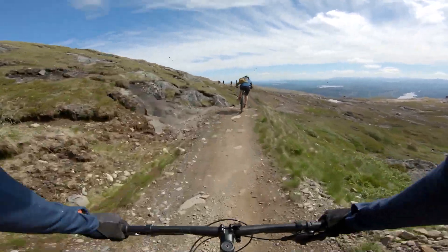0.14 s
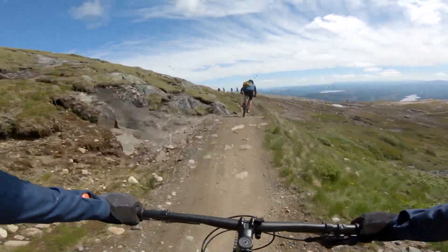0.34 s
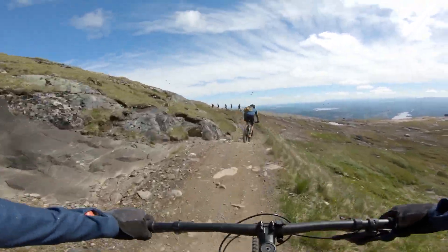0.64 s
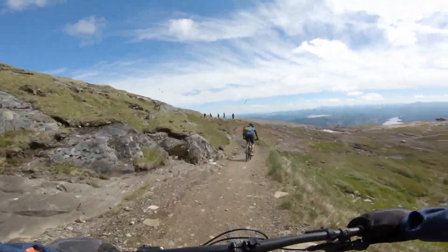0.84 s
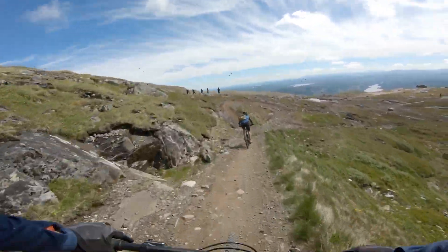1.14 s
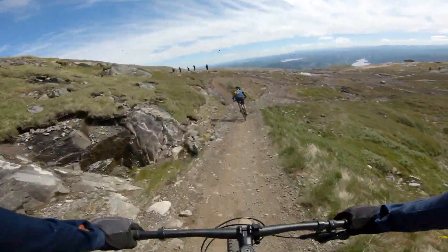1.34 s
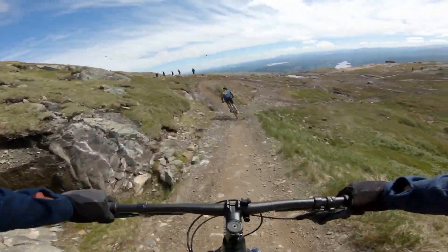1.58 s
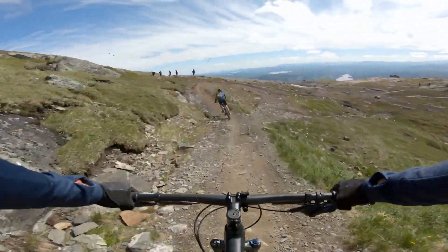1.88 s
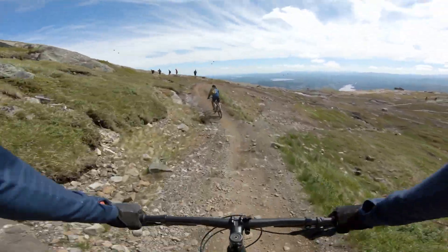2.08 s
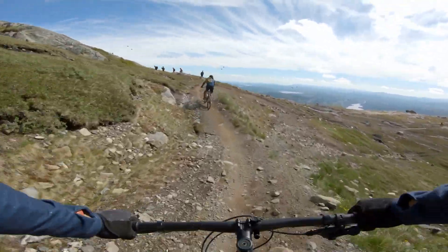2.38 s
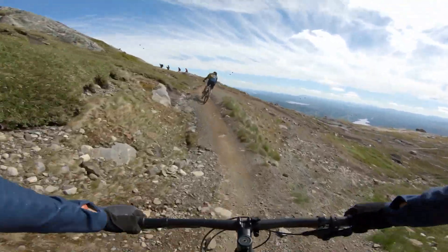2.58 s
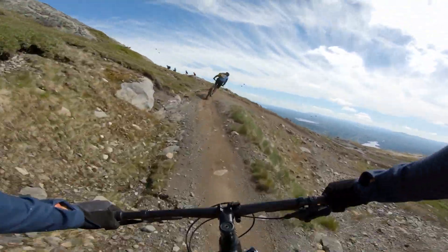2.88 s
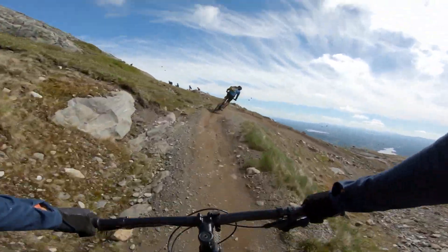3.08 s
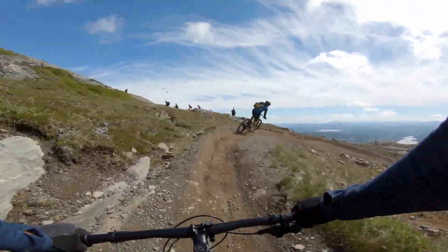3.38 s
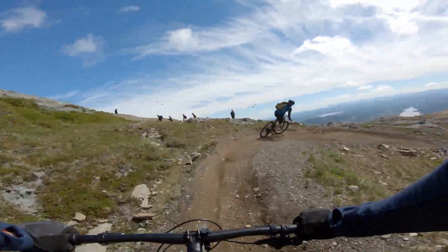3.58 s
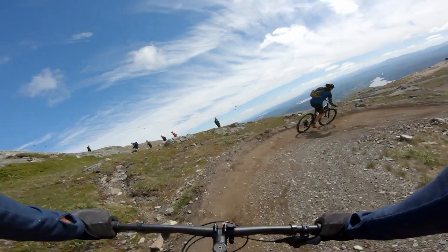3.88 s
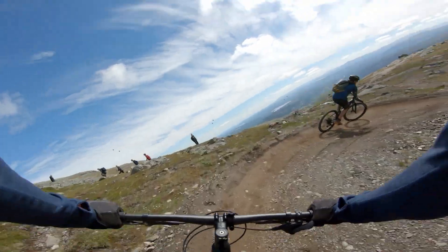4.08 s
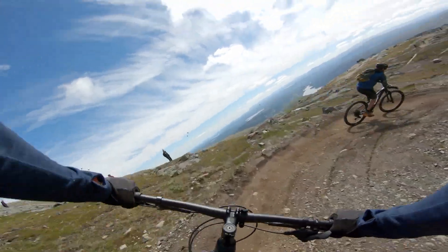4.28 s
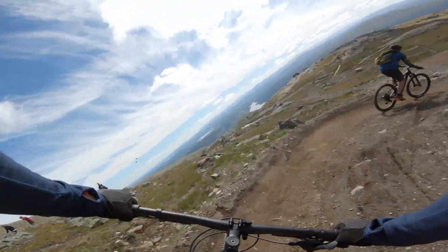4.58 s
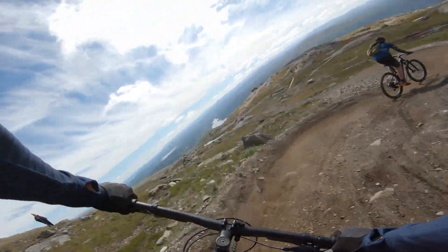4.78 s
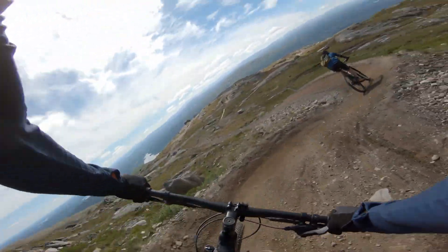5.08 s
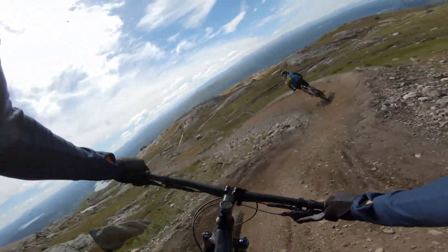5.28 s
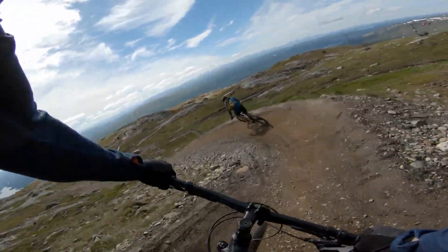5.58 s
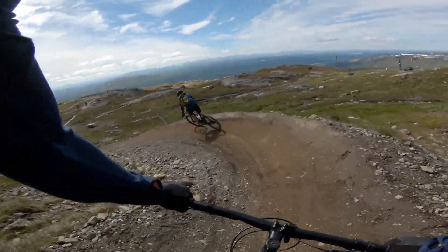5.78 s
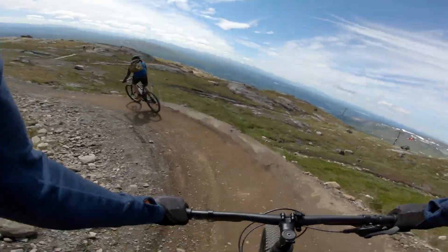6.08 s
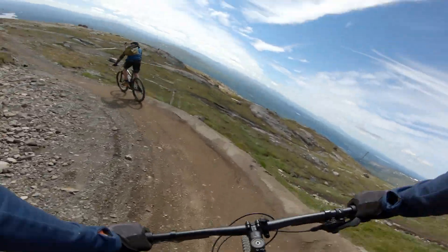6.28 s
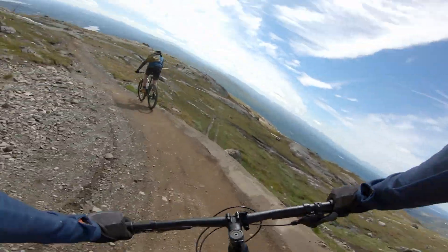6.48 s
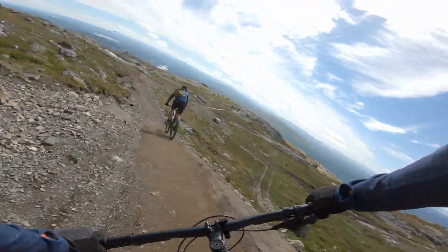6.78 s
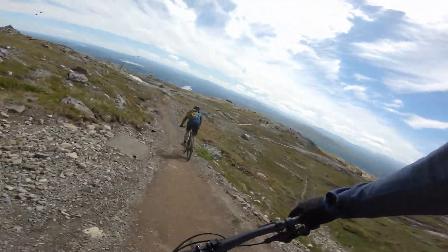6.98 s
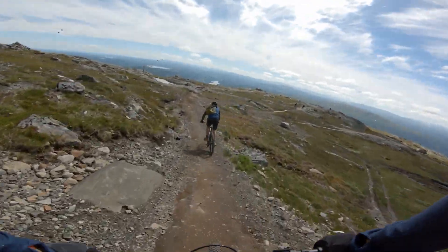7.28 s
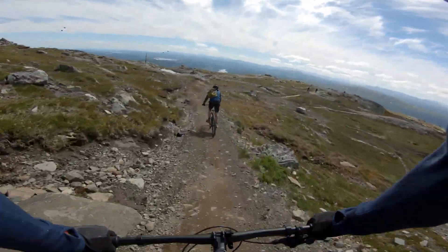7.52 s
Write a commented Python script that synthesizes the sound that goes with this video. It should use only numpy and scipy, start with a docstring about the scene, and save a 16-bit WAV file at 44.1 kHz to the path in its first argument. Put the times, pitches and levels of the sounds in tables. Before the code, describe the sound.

A mountain bike runs fast down a stony trail, heard close up from the rider's chest with slightly dulled treble. Low wind rumbles and flutters on the microphone throughout, with irregular thumping gusts. Beneath it the tyres crunch through loose gravel, stones crack and spray against the frame, pebbles tick off the spokes, and a loose metal part buzzes. The clatter is dense for the first 0.6 seconds, then drops away in a brief hop from about 1.2 to 1.4 seconds. It returns strongly, with hard wind buffets between 2 and 3 seconds. One sharp stone crack stands out near 3.8 seconds. The wind eases from about 4.3 to 5 seconds as a few soft hollow knocks sound. Gusts build again after 5.2 seconds, with more knocks around 6. The buzz fades by 6.7 seconds, leaving wind, lighter crunching and scattered clicks until about 7.6 seconds.

```python
"""Mountain bike on a stony trail.

A fast descent, heard by a housed microphone on the rider's chest. Wind rumbles and flutters on the port.
The tyres growl and crunch in loose gravel; stones crack and spray against the frame, pebbles tick off
rims and spokes. A loose metal part buzzes near 2.5 kHz. The housing dulls the treble."""
import sys
import numpy as np
from scipy import signal
from scipy.fft import rfft, irfft
from scipy.io import wavfile

SR = 44100
rng = np.random.default_rng(int(sys.argv[2]) if len(sys.argv) > 2 else 0)


def digitize_waveform(pressure):
    """Quantize a signal to 16-bit integers and store it at the path in sys.argv[1].

    Rows of a 2-D input are taken as channels; values are limited to [-1, 1].
    """
    field = np.atleast_2d(pressure).T
    bounded = np.clip(field, -1, 1)
    quanta = np.round(bounded * 32767).astype(np.int16)
    wavfile.write(sys.argv[1], SR, quanta)


N = 337365

# air on the port (time [s], rumble [dB], buffet [dB], flutter [dB])
WIND_LEVELS = [(0.0, -25.5, -25.5, -34.5), (0.4, -21.5, -27.5, -32), (0.66, -18, -24, -32),
               (0.91, -24, -29, -41), (1.32, -27, -32.5, -47.5), (1.77, -20, -32, -40),
               (2.28, -24, -25.5, -37), (2.79, -20, -23.5, -34), (2.96, -17.5, -28.5, -37),
               (2.98, -26.5, -31, -40), (3.4, -25.5, -29.5, -41.5), (3.73, -22, -31.5, -39.5),
               (3.92, -19.5, -27.5, -37), (4.35, -31.5, -37, -39), (4.6, -24.5, -40, -42),
               (4.94, -31, -40.5, -39.5), (4.96, -26, -38.5, -39.5), (5.41, -24.5, -26, -41),
               (5.56, -17, -26.5, -37), (5.8, -20, -26, -32.5), (6.45, -20.5, -29, -43.5),
               (6.75, -23, -34, -52.5), (7.26, -25.5, -28, -43.5), (7.44, -21.5, -27, -37),
               (7.65, -17, -25, -30)]
# short gusts (centre [s], half length [s], buffet lift [dB])
WIND_GUSTS = [(.57, 0.035, 6.5), (.72, 0.14, 4), (1.04, 0.056, 3.5), (1.45, 0.066, 5), (1.6, 0.21, 3),
              (1.7, 0.03, 4), (2.04, 0.11, 7), (2.15, 0.05, 5), (2.38, 0.15, 4), (2.52, 0.06, 2),
              (2.84, 0.12, 2.5), (2.94, 0.035, 4), (3.3, 0.097, 1.5), (3.47, 0.044, 6.5),
              (3.95, 0.069, 3.5), (4.37, 0.07, 5), (5.24, 0.18, 7), (5.36, 0.028, 1.5), (5.66, 0.12, 6.5),
              (5.82, 0.053, 1.5), (5.98, 0.071, 5), (6.08, 0.02, 6.5), (6.18, 0.024, 4), (6.29, 0.016, 6),
              (6.47, 0.024, 9), (6.52, 0.03, 7.5), (6.61, 0.038, 5.5), (6.69, 0.04, 6.5), (6.79, 0.043, 5),
              (6.92, 0.1, 9), (7.0, 0.026, 7.5), (7.19, 0.034, 4), (7.36, 0.085, 3), (7.48, 0.039, 4)]
# eddies slapping the port (time [s], tear before trim [dB], push [dB])
EDDY_SLAPS = [(0.11, -40, -20), (0.498, -13, -10), (0.56, -19, -12), (0.587, -8, -22), (0.617, -16, -31),
              (0.715, -29, -11), (0.779, -16.5, -24), (1.032, -15.5, -18), (1.581, -13.5, -14),
              (2.018, -10.5, -11), (2.037, -24, -15), (2.132, -28, -13.5), (2.289, -18, -22),
              (2.338, -13.5, -10), (2.373, -8, -17), (2.431, -16, -7.5), (2.501, -16, -6.5),
              (2.803, -14, -15), (2.839, -26, -11.5), (2.927, -15, -17), (2.942, -22, -9), (2.95, -18, -18),
              (3.254, -25, -16.5), (3.454, -13.5, -12.5), (3.477, -16, -13), (3.912, -19, -15),
              (3.977, -22, -20), (4.367, -14.5, -23), (4.447, -20, -36), (4.738, -25, -30),
              (5.237, -16, -20), (5.346, -31, -15), (5.506, -31, -28), (5.571, -28, -19), (5.625, -6, -34),
              (5.662, -14, -22), (5.748, -27, -29), (5.8, -17, -17.5), (5.877, -13.5, -32),
              (5.974, -20.5, -17), (6.014, -33, -26), (6.072, -23, -21), (6.165, -37, -12.5),
              (6.19, -23, -26), (6.288, -34, -11.5), (6.505, -30, -19), (6.801, -26.5, -28),
              (6.925, -25, -19), (6.99, -41, -26), (7.053, -27, -26), (7.18, -20, -26), (7.323, -28, -18.5),
              (7.355, -36, -24), (7.445, -25, -32), (7.468, -15.5, -16), (7.498, -18, -12.5),
              (7.566, -30, -18), (7.59, -23, -15)]
# tyres on the trail (time [s], crunch [dB], growl [dB], grit [dB])
TYRE_LEVELS = [(0.0, -35, -38.5, -52.5), (0.34, -41.5, -35.5, -53), (0.53, -41.5, -33, -60),
               (1.19, -46, -55, -63), (1.45, -43, -45, -59.5), (1.64, -38.5, -36, -52.5),
               (1.89, -36.5, -40.5, -54.5), (2.73, -40, -34, -55.5), (3.15, -44, -44.5, -62),
               (3.79, -40, -47, -55.5), (4.22, -39.5, -46, -53.5), (4.45, -42.5, -44.5, -56),
               (4.7, -42.5, -47.5, -56.5), (4.9, -43, -50, -56), (5.05, -42.5, -49.5, -54.5),
               (5.37, -38.5, -42, -54), (5.8, -41.5, -43, -58.5), (6.07, -46, -62, -61),
               (6.54, -45, -51.5, -57.5), (6.9, -48, -52, -62.5), (7.31, -42, -45.5, -61),
               (7.45, -42.5, -45, -62), (7.65, -41, -45, -58.5)]
# patches of coarser stones (centre [s], half length [s], crunch lift [dB])
COARSE_PATCHES = [(.25, 0.079, 6.5), (.38, 0.051, 3), (.59, 0.11, 4), (1.11, .05, 3.5), (1.6, 0.046, 1),
                  (1.78, 0.032, 2.5), (2.0, 0.064, 4.5), (2.16, 0.036, 3.5), (2.35, 0.027, 4.5),
                  (2.74, 0.02, -3), (2.84, 0.046, 5.5), (3.3, 0.017, 3), (3.71, 0.028, 7.5),
                  (3.8, 0.028, 3.5), (3.94, 0.072, 4), (4.03, 0.035, 4.5), (4.16, 0.036, 2),
                  (4.36, 0.038, 6), (5.07, 0.023, 5), (5.24, 0.053, 4), (5.5, 0.042, 1.5),
                  (5.67, 0.069, 3.5), (6.25, 0.077, 3.5), (6.46, 0.037, 8), (6.94, 0.054, 2)]
# buzz of the loose part (time [s], level re crunch [dB])
RATTLE_LEVELS = [(0, -3), (.6, 4.5), (.9, -8), (1.5, 0), (1.75, -1.5), (2.0, 2), (2.2, -2.5), (2.4, -1.5),
                 (2.85, 3), (3.1, 2), (3.45, -4.5), (3.65, -7), (4.1, -6.5), (4.6, -8), (5.3, -4),
                 (6.0, -22), (6.22, -12), (6.3, -2.5), (6.38, -1), (6.45, -6), (6.55, -7), (6.65, -27),
                 (7.65, -30)]
# its resonances (frequency [Hz], width [Hz], relative level [dB])
METAL_MODES = [(2560, 240, -1), (1375, 160, -7)]
# blows on frame and tyre casing (time [s], level [dB], pitch [Hz])
HOLLOW_KNOCKS = [(4.335, -34, 1200), (4.405, -31, 1154), (4.447, -29.5, 523), (4.665, -35.5, 990),
                 (4.712, -31, 533), (4.738, -31.5, 540), (4.838, -34, 517), (5.625, -28, 744),
                 (5.883, -29, 820), (5.975, -33, 840), (6.075, -32, 797)]
# pebbles on rims and spokes (time [s], tick [dB], sparkle [dB])
PEBBLE_TICKS = [(0.0378, -42, -56), (0.2548, -34, -61), (0.2877, -34.5, -65), (0.3401, -37, -66),
                (0.3815, -40, -65), (0.4135, -37, -68), (0.4964, -42, -68), (0.9842, -43.5, -72),
                (1.4576, -45, -74), (1.511, -44, -65), (1.5768, -36, -64), (1.7868, -39, -56),
                (1.9699, -37, -54), (2.0154, -39, -60), (2.055, -34, -57), (2.0762, -37, -66),
                (2.1565, -42, -64), (2.2574, -44, -67), (2.4694, -42, -65), (2.7324, -39, -63),
                (2.7392, -37, -63), (2.83, -42, -68), (3.1073, -32, -48), (3.245, -43, -63),
                (3.2914, -40, -57), (3.3403, -44, -67), (3.3887, -45, -62), (3.4251, -39, -55),
                (3.9539, -34, -64), (3.9818, -35, -60), (4.0168, -44, -67), (4.4069, -37, -63),
                (4.5216, -41, -68), (4.6952, -47, -71), (4.7626, -40, -67), (4.8419, -37, -66),
                (5.005, -48, -73), (5.0684, -39, -67), (5.1337, -40, -63), (5.2435, -34, -62),
                (5.3043, -38, -67), (5.3467, -43, -68), (5.5054, -40, -68), (5.532, -36, -65),
                (5.694, -38, -65), (5.9549, -46, -72), (6.9446, -43, -68), (7.1801, -52, -68),
                (7.435, -42, -70)]
# chips thrown at the frame (start [s], length [s], level [dB], pitch [Hz])
CHIP_SPRAYS = [(0.035, 0.014, -27.5, 2640), (0.107, 0.012, -22, 2470), (0.133, 0.01, -27, 1770),
               (0.202, 0.011, -33, 2480), (0.232, 0.0045, -33, 2460), (0.255, 0.0089, -29, 2210),
               (0.285, 0.014, -29, 2600), (0.319, 0.004, -28, 2000), (0.369, 0.011, -25.5, 2600),
               (0.39, 0.0046, -31, 2550), (0.427, 0.012, -30, 2660), (0.453, 0.014, -25.5, 1780),
               (0.501, 0.011, -33, 2570), (0.52, 0.0092, -32, 1810), (0.563, 0.0062, -30, 2560),
               (0.6, 0.0037, -34, 1830), (0.74, 0.0042, -38, 2770), (0.808, 0.0052, -39, 2450),
               (0.982, 0.0044, -28.5, 2400), (1.395, 0.01, -38, 2540), (1.44, 0.0064, -40, 2590),
               (1.4723, 0.005, -37, 2480), (1.513, 0.011, -30, 2370), (1.537, 0.019, -26.5, 2520),
               (1.574, 0.0086, -30, 2560), (1.588, 0.018, -26.5, 2120), (1.61, 0.018, -32, 2640),
               (1.6753, 0.017, -33.5, 1530), (1.725, 0.0053, -30, 1800), (1.756, 0.008, -31, 2380),
               (1.92, 0.0094, -27.5, 1710), (1.962, 0.018, -29, 2460), (1.987, 0.015, -41, 2500),
               (2.016, 0.0048, -27, 1520), (2.16, 0.0068, -24.5, 2540), (2.241, 0.008, -41, 1710),
               (2.34, 0.028, -38, 1450), (2.427, 0.0084, -29, 2470), (2.492, 0.0087, -32, 2700),
               (2.62, 0.0225, -32.5, 2470), (2.683, 0.0115, -34, 2440), (2.736, 0.021, -27.5, 2350),
               (2.831, 0.008, -23, 2400), (2.932, 0.02, -35, 2570), (3.109, 0.0049, -27, 2470),
               (3.243, 0.0117, -40, 2620), (3.27, 0.031, -33.5, 2540), (3.335, 0.007, -33, 2500),
               (3.39, 0.0071, -30, 2430), (3.401, 0.027, -34, 2580), (3.434, 0.0092, -33, 2590),
               (3.485, 0.0062, -31, 2570), (3.558, 0.018, -35, 2270), (3.674, 0.006, -34, 2480),
               (3.699, 0.0056, -27, 2890), (3.717, 0.0085, -30, 2530), (3.757, 0.004, -27, 2780),
               (3.777, 0.0133, -34, 2530), (3.916, 0.0087, -22.5, 2900), (3.951, 0.0057, -26, 2570),
               (4.014, 0.014, -26, 2530), (4.096, 0.006, -38, 2470), (4.144, 0.015, -33, 2640),
               (4.18, 0.0051, -32, 2610), (4.332, 0.012, -27, 2520), (4.364, 0.0049, -40, 2640),
               (4.396, 0.032, -37, 2200), (4.719, 0.02, -36.5, 1410), (4.756, 0.018, -38, 2590),
               (4.837, 0.015, -34, 2480), (4.897, 0.0071, -35, 2810), (5.067, 0.0282, -40, 2580),
               (5.233, 0.019, -26.5, 2600), (5.284, 0.006, -29, 2840), (5.342, 0.005, -29, 3120),
               (5.408, 0.008, -39, 2300), (5.505, 0.0075, -41, 2580), (5.58, 0.0051, -28, 2380),
               (5.907, 0.0094, -38, 2660), (5.973, 0.02, -45, 2660), (6.16, 0.0069, -34, 2790),
               (6.188, 0.0117, -40, 2610), (6.235, 0.015, -28, 2440), (6.299, 0.0056, -35, 2480),
               (6.364, 0.0091, -38, 2590), (6.496, 0.0097, -36, 2500), (6.907, 0.028, -41, 2360),
               (6.946, 0.0047, -33, 2450), (7.168, 0.0171, -40, 2700), (7.246, 0.0061, -31.5, 2370),
               (7.372, 0.011, -38.5, 2220), (7.428, 0.01, -44, 2190), (7.589, 0.0089, -35, 1560)]
# stones hitting the frame (time [s], level [dB], pitch [Hz], rise [cycles])
STONE_HITS = [(0.0422, -23, 2620, 3.3), (0.1125, -16, 2560.0, 1.7), (0.141, -22, 2550.0, 1.3),
              (0.2569, -12, 1920.0, 1.0), (0.2627, -22, 2170, 3.3), (0.3728, -18, 2630.0, 1.4),
              (0.3826, -16, 2840, 1.1), (0.4265, -17, 2650.0, 1.3), (0.5065, -21, 2560, 3.0),
              (0.5224, -22, 1830, 1.1), (0.5593, -18, 2540.0, 3.9), (0.5966, -17, 1850.0, 2.0),
              (0.7422, -21.5, 2770, 1.2), (0.8118, -24, 2480.0, 2.9), (0.8289, -26, 2450.0, 1.1),
              (0.9844, -20, 2350, 0.66), (0.9973, -28, 2560, 1.5), (1.3993, -33, 2540.0, 1.3),
              (1.4417, -20, 2560, 1.3), (1.4723, -24, 2430, 2.0), (1.6368, -18, 2350.0, 1.0),
              (1.676, -21, 3680, 1.4), (1.7287, -23, 1820.0, 1.4), (1.9302, -18.5, 1730.0, 1.9),
              (2.026, -17.5, 1510, 1.2), (2.1588, -18, 2540, 1.2), (2.3265, -20, 1630.0, 0.9),
              (2.436, -17, 1670.0, 0.7), (2.623, -26, 2070, 1.0), (2.8321, -22, 2520.0, 1.5),
              (3.1096, -21.5, 2480.0, 2.5), (3.3399, -30, 2920.0, 0.88), (3.4914, -15, 2560.0, 1.5),
              (3.5025, -26, 2680, 2.4), (3.6274, -27.5, 2230.0, 0.9), (3.7013, -29, 2830, 2.2),
              (3.719, -26, 2520.0, 1.6), (3.7588, -8.5, 2680, 1.2), (3.9212, -27, 2900, 2.1),
              (3.9575, -36, 2530.0, 1.1), (4.02, -22, 2490.0, 2.5), (4.143, -24, 2600, 1.8),
              (4.1818, -16.5, 2550, 1.8), (4.34, -22, 2370, 3.0), (4.3634, -24, 2600, 2.0),
              (4.7694, -30, 3070.0, 1.7), (5.0936, -37, 1540.0, 0.55), (5.3877, -21, 2570.0, 1.0),
              (5.5106, -27, 2650.0, 2.1), (5.5848, -25, 2380.0, 2.2), (5.8432, -24, 2600, 2.5),
              (5.9208, -26, 2570.0, 2), (5.9478, -24, 2540, 1.8), (5.9631, -23, 2560.0, 1.1),
              (6.0304, -26, 2560.0, 1.3), (6.1658, -32, 2790.0, 1.3), (6.2448, -26, 2420, 1.3),
              (6.2801, -28, 3150.0, 1.3), (6.308, -31, 2490.0, 1.8), (6.4987, -36, 2490.0, 3.0),
              (6.7027, -32, 2370, 1.2), (6.9454, -24, 2430.0, 1.4), (6.9621, -30, 3470.0, 1.2),
              (7.1889, -30, 2590.0, 0.8), (7.2136, -30, 2770, 3.0), (7.2292, -26, 2670.0, 1),
              (7.2501, -26, 2360.0, 2.7)]

# wind spectra (frequency [Hz], relative density [dB])
RUMBLE_SPECTRUM = [(10, -20), (22, 1), (40, 1), (60, 3), (80, 1.5), (100, 0.5), (130, -5), (200, -20),
                   (400, -71), (3000, -130)]
BUFFET_SPECTRUM = [(60, -26), (120, 0.5), (170, 1), (270, -2.5), (350, -11.5), (600, -28.5), (1500, -87),
                   (6000, -130)]
FLUTTER_SPECTRUM = [(150, -20), (300, -2.5), (450, -1), (600, -4.5), (900, -15), (1500, -28.5),
                    (4000, -66.5), (9000, -120)]
TEAR_SPECTRUM = [(150, -22.5), (350, -0.5), (700, -8.5), (1100, -14.5), (1600, -20.5), (3000, -43),
                 (9000, -110)]
# gravel and pebble filters (frequency [Hz], relative gain [dB])
GROWL_SPECTRUM = [(300, -4.5), (600, -9), (1000, 0.5), (1400, 1), (1800, 3), (2100, -1.5), (3000, -13),
                  (6000, -71), (12000, -110)]
CRUNCH_SPECTRUM = [(600, -35), (1400, -4), (2000, -11.5), (2300, -2.5), (2600, -3.5), (3000, -3.5),
                   (3400, -7.5), (4100, -10), (4900, -11.5), (5400, -21.5), (5900, -41), (9000, -81.5),
                   (14000, -100)]
GRIT_SPECTRUM = [(3500, -1), (5500, 4.5), (6500, 2.5), (7900, 0.5), (8800, -8), (10500, -11), (12500, -16),
                 (14000, -39.5), (16000, -48)]
TICK_SPECTRUM = [(3000, 0), (5500, 3.5), (7600, -3), (8800, -8), (10000, -32), (16000, -78)]
SPARKLE_SPECTRUM = [(6000, -43), (8800, -3), (10500, 1), (12300, -8), (13200, -13), (14200, -23),
                    (16000, -47)]

GRAINS_PER_S = 2500
HOP_START_S, HOP_END_S, HOP_DROP_DB, HOP_EDGE_S = 1.182, 1.43, 7.5, 0.0048   # airborne over a crest
SPRAY_RISE_S, SPRAY_T60_S, SPRAY_WIDTH_HZ, SPRAY_BROAD_SHARE = 0.00073, 0.03, 340, 0.42
HOUSING_HZ, CUTOFF_HZ = 5530, 14300


def amp(db):
    """Decibels to gain."""
    return 10 ** (np.asarray(db) / 20)


def rms_one(x):
    """Scale to rms 1."""
    return x / np.sqrt(np.mean(x ** 2) + 1e-20)


def curves(rows):
    """Columns of a time table, one value per sample."""
    times_s, *columns = np.transpose(rows)
    return [np.interp(np.arange(N) / SR, times_s, column) for column in columns]


def swells(rows):
    """Sum of raised-cosine bumps, in dB."""
    out = np.zeros(N)
    for centre_s, half_s, db in rows:
        at = np.arange(max(round((centre_s - half_s) * SR), 0), min(round((centre_s + half_s) * SR), N))
        out[at] += db * np.cos(np.pi / 2 * (at / SR - centre_s) / half_s) ** 2
    return out


def drift(corner_hz):
    """Random wander, rms 1: noise through two one-pole low-passes."""
    step, settle = 20, 2000
    pole = np.exp(-2 * np.pi * corner_hz * step / SR)
    white = rng.standard_normal(N // step + settle + 2)
    slow = signal.lfilter([1], [1, -2 * pole, pole * pole], white)[settle:]
    return np.interp(np.arange(N) / step, np.arange(len(slow)), rms_one(slow))


def colour(x, spectrum):
    """Minimum-phase filter from a spectrum table; white noise keeps its rms."""
    hz, db = np.transpose(spectrum)
    size = 8192
    grid_hz = np.maximum(np.arange(size // 2 + 1) * SR / size, 1)
    gain = amp(np.interp(np.log(grid_hz), np.log(hz), db))
    cepstrum = irfft(np.log(gain))
    cepstrum[1:size // 2] *= 2
    cepstrum[size // 2 + 1:] = 0
    response = irfft(np.exp(rfft(cepstrum)))
    return signal.oaconvolve(x, response / np.sqrt(np.sum(response ** 2)))[:N]


def resonance(x, hz, width_hz):
    """Two-pole band-pass, peak gain 1."""
    r = np.exp(-np.pi * width_hz / SR)
    gain = (1 - r * r) / 2
    return signal.lfilter([gain, 0, -gain], [1, -2 * r * np.cos(2 * np.pi * hz / SR), r * r], x)


def bursts(times_s, levels_db, t60_s, rise_s):
    """Envelope of rising, decaying bursts."""
    onsets, t = np.zeros(N), np.arange(SR // 4) / SR
    onsets[np.round(times_s * SR).astype(int)] = amp(levels_db)
    shape = amp(-60 * t / t60_s) * (1 - np.exp(-t / rise_s))
    return signal.oaconvolve(onsets, shape)[:N]


def pings(times_s, levels_db, pitches_hz, rise_cycles, t60_cycles, ring_db):
    """Damped sines: a hard pulse, then a weaker ring."""
    out, t = np.zeros(N + SR), np.arange(SR // 40) / SR
    for start_s, db, hz, cycles in np.broadcast(times_s, levels_db, pitches_hz, rise_cycles):
        at, rise = round(start_s * SR), t * hz / cycles
        pulse = (rise * np.exp(1 - rise)) ** 2
        ring = amp(ring_db - 60 * t * hz / t60_cycles) * (1 - np.exp(-rise))
        out[at:at + len(t)] += amp(db) * (pulse + ring) * np.sin(2 * np.pi * hz * t)
    return out[:N]


def housing(x):
    """Steep low-pass of the microphone housing."""
    return signal.sosfilt(signal.butter(6, HOUSING_HZ, fs=SR, output="sos"), x + 1e-18)


def air_rush():
    """Steady hiss of air past the wheels."""
    return amp(-68) * colour(rng.standard_normal(N), GRIT_SPECTRUM)


def wind():
    """Turbulence on the port: big eddies rumble, smaller ones buffet and flutter."""
    rumble_db, buffet_db, flutter_db = curves(WIND_LEVELS)
    eddies, gust_db = drift(29), swells(WIND_GUSTS)
    rumble = colour(amp(1.12 * eddies) * rng.standard_normal(N), RUMBLE_SPECTRUM)
    buffet = colour(amp(1.4 * eddies + 0.29 * drift(29)) * rng.standard_normal(N), BUFFET_SPECTRUM)
    flutter = colour(amp(0.43 * eddies + 2.5 * drift(47)) * rng.standard_normal(N), FLUTTER_SPECTRUM)
    return (amp(rumble_db + 0.61 * gust_db) * rms_one(rumble)
            + amp(buffet_db + gust_db) * rms_one(buffet)
            + amp(flutter_db + 1.26 * gust_db) * rms_one(flutter))


def slaps():
    """Single eddies hit the port: a noisy tear and a low pressure push."""
    times_s, tear_db, push_db = np.transpose(EDDY_SLAPS)
    envelope = bursts(times_s, tear_db - 7, t60_s=0.096, rise_s=0.0043)
    tears = colour(envelope * rng.standard_normal(N), TEAR_SPECTRUM)
    push_hz = 300 * amp(rng.normal(0, 1.46, len(times_s)))
    return tears + pings(times_s, push_db, push_hz, rise_cycles=0.54, t60_cycles=5, ring_db=-18)


def trail_db():
    """Crunch, growl and grit levels: up on coarse patches, down during the hop."""
    crunch_db, growl_db, grit_db = curves(TYRE_LEVELS)
    t = np.arange(N) / SR
    airborne = np.clip(np.minimum(t - HOP_START_S, HOP_END_S - t) / HOP_EDGE_S, 0, 1)
    lift_db = swells(COARSE_PATCHES) - HOP_DROP_DB * airborne
    return crunch_db + lift_db, growl_db + 0.7 * lift_db, grit_db + 0.81 * lift_db


def gravel(clump_db, low_hz, high_hz, t60_cycles, sand_gain):
    """Clumped pebbles of uneven size, each ringing at one of 16 pitches, over a hiss of sand."""
    sizes = amp(3.4 * np.minimum(rng.exponential(1, N), 5)) * rng.choice([-1, 1], N)
    impacts = amp(clump_db) * sizes * (rng.random(N) < GRAINS_PER_S / SR)
    pitch_index, pebbles = rng.integers(0, 16, N), 0
    for k, hz in enumerate(np.geomspace(low_hz, high_hz, 16)):
        width_hz = np.log(1000) / np.pi * hz / t60_cycles
        pebbles += resonance(impacts * (pitch_index == k) + 1e-18, hz, width_hz)
    sand = amp(clump_db) * rng.standard_normal(N)
    return rms_one(pebbles) + sand_gain * rms_one(sand)


def rattle():
    """Gravel jolts shake a loose metal part that rings in two narrow bands."""
    jolts = gravel(2.7 * drift(37), 1260, 3340, t60_cycles=6.2, sand_gain=1.2)
    ringing = 0
    for hz, width_hz, db in METAL_MODES:
        drive = resonance(jolts, hz, 3 * width_hz)
        ringing += amp(db) * rms_one(resonance(drive, hz, width_hz))
    crunch_db = trail_db()[0]
    return amp(crunch_db + curves(RATTLE_LEVELS)[0]) * rms_one(ringing)


def knocks():
    """Soft blows ring hollow in frame and tyre casing."""
    return pings(*np.transpose(HOLLOW_KNOCKS), rise_cycles=4.5, t60_cycles=45, ring_db=-14)


def pebble_ticks():
    """Pebbles tick unevenly off rims and spokes, some with a bright edge."""
    times_s, tick_db, sparkle_db = np.transpose(PEBBLE_TICKS)
    patter = amp(1.6 * drift(120)) * rng.standard_normal((2, N))
    ticks = bursts(times_s, tick_db, t60_s=0.042, rise_s=0.0009) * patter[0]
    sparkle = bursts(times_s, sparkle_db, t60_s=0.053, rise_s=0.0012) * patter[1]
    return colour(ticks, TICK_SPECTRUM) + colour(sparkle, SPARKLE_SPECTRUM)


def tyres():
    """One bed of loose stones drives knob growl, crunch and fine grit, so they swell partly together."""
    crunch_db, growl_db, grit_db = trail_db()
    clumps = drift(77) + 0.72 * drift(58)
    growl = gravel(1.75 * clumps + 2.9 * drift(9.3), 720, 2410, t60_cycles=15, sand_gain=3.05)
    crunch = gravel(1.08 * clumps, 1818, 5980, t60_cycles=91, sand_gain=1.97)
    grit = gravel(2.05 * clumps + 0.39 * drift(30), 5000, 13000, t60_cycles=32, sand_gain=2.4)
    return (amp(growl_db) * rms_one(colour(growl, GROWL_SPECTRUM))
            + amp(crunch_db) * rms_one(colour(crunch, CRUNCH_SPECTRUM))
            + amp(grit_db) * rms_one(colour(grit, GRIT_SPECTRUM)))


def sprays():
    """Each handful of chips patters on the frame and rings it at one pitch over a broad crunch."""
    out, t = np.zeros(N + SR), np.arange(SR // 8) / SR
    chips = amp(2 * drift(150)) * rng.standard_normal((2, N))
    broad = np.pad(colour(chips[0], CRUNCH_SPECTRUM), (0, SR))
    white = np.pad(chips[1], (0, SR))
    makeup_gain = np.sqrt(SR / np.pi / SPRAY_WIDTH_HZ)
    for start_s, length_s, db, hz in CHIP_SPRAYS:
        at = round(start_s * SR) + np.arange(len(t))
        decay = amp(-60 * np.maximum(t - length_s, 0) / SPRAY_T60_S)
        envelope = (1 - np.exp(-t / SPRAY_RISE_S)) * decay
        ringing = makeup_gain * resonance(envelope * white[at], hz, SPRAY_WIDTH_HZ)
        crunch = envelope * broad[at]
        out[at] += amp(db) * (SPRAY_BROAD_SHARE * crunch + (1 - SPRAY_BROAD_SHARE) * ringing)
    return out[:N]


def stone_cracks():
    """Each stone cracks on the frame and rings briefly and roughly at its own pitch."""
    roughness = amp(1.5 * drift(250))
    return roughness * pings(*np.transpose(STONE_HITS), t60_cycles=66, ring_db=-14)


def scene():
    """Wind, tyres, stones and frame in open air; mono."""
    bed = wind() + slaps() + tyres() + air_rush()
    impacts = knocks() + housing(stone_cracks()) + pebble_ticks() + housing(sprays())
    return (bed + impacts + rattle())[None]


def record(dry):
    """Soft clip, then a steep treble cut."""
    rounded = 0.71 * np.tanh(dry / 0.78)
    return signal.sosfilt(signal.cheby2(12, 60, CUTOFF_HZ, fs=SR, output="sos"), rounded)


dry = scene()
out = record(dry)
digitize_waveform(out)
```